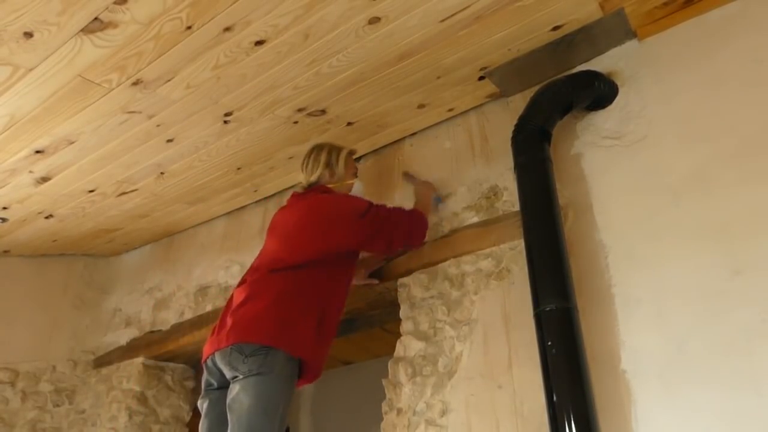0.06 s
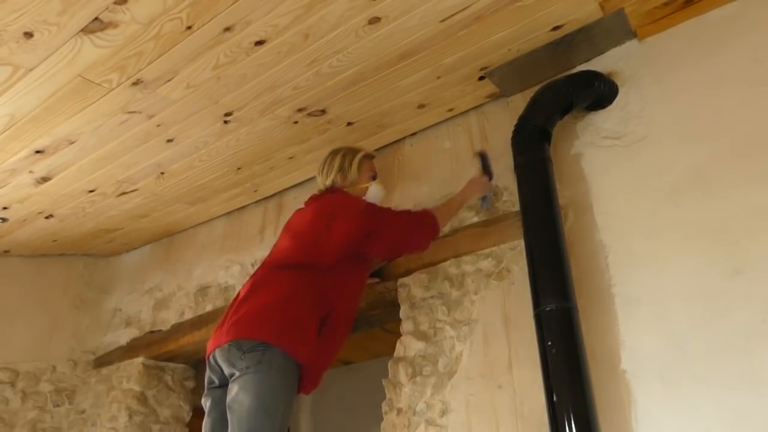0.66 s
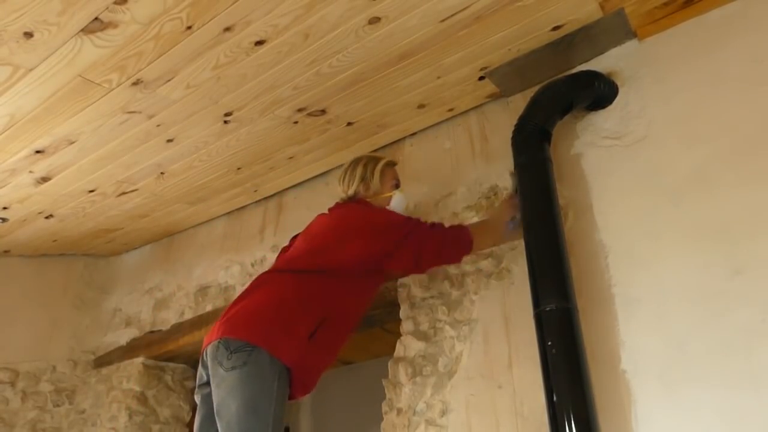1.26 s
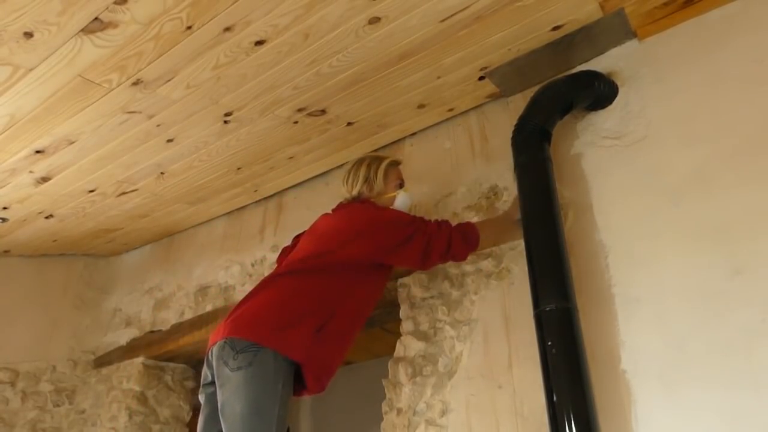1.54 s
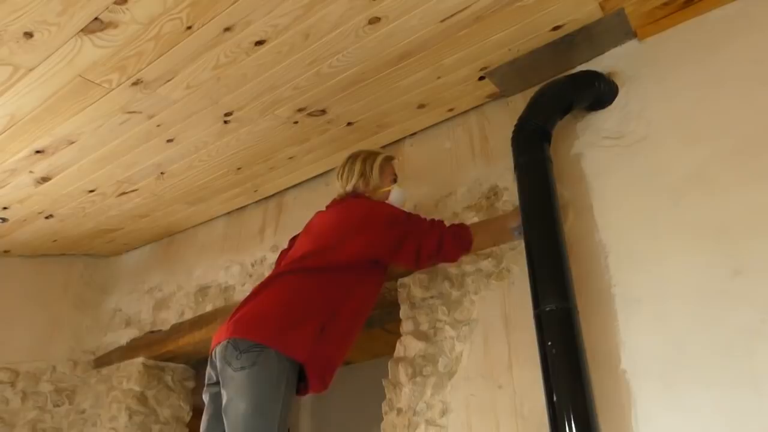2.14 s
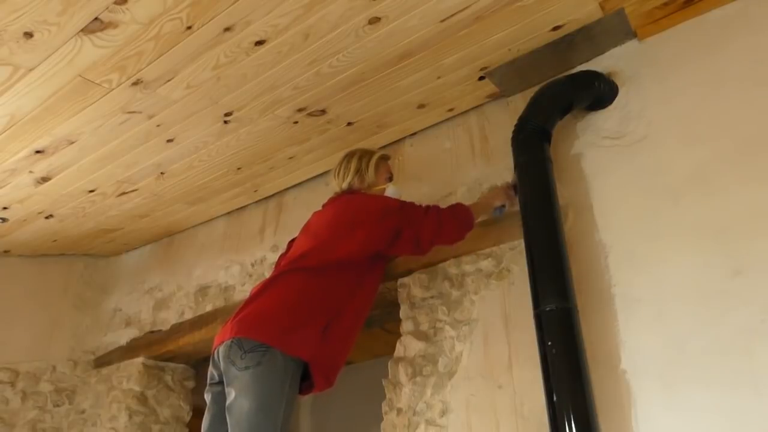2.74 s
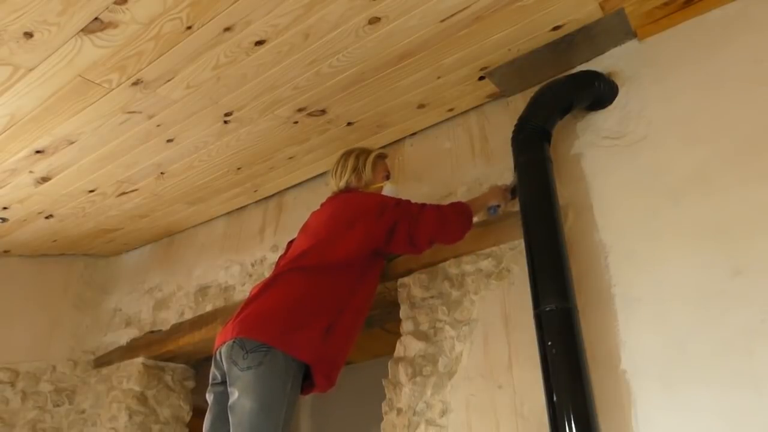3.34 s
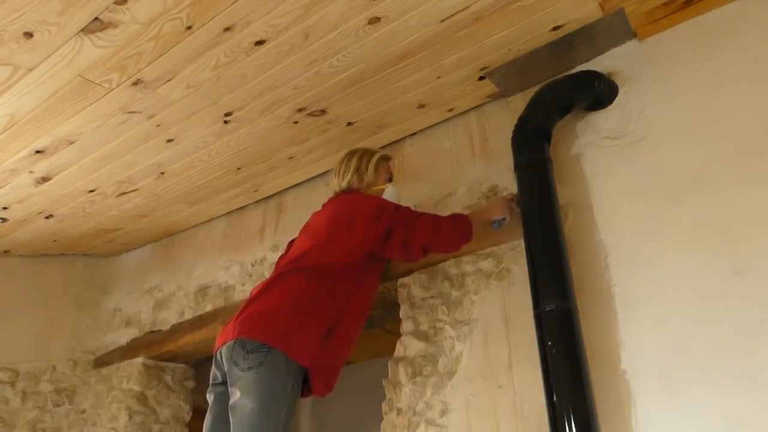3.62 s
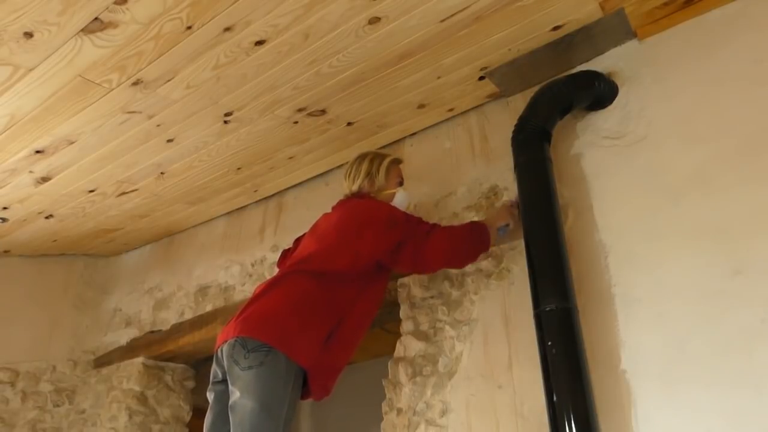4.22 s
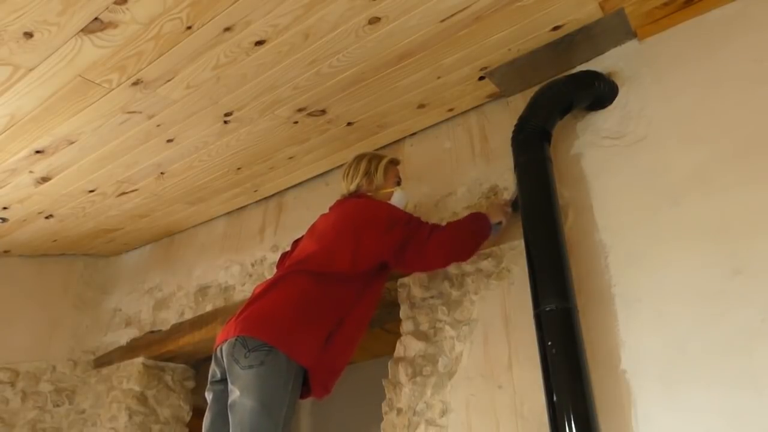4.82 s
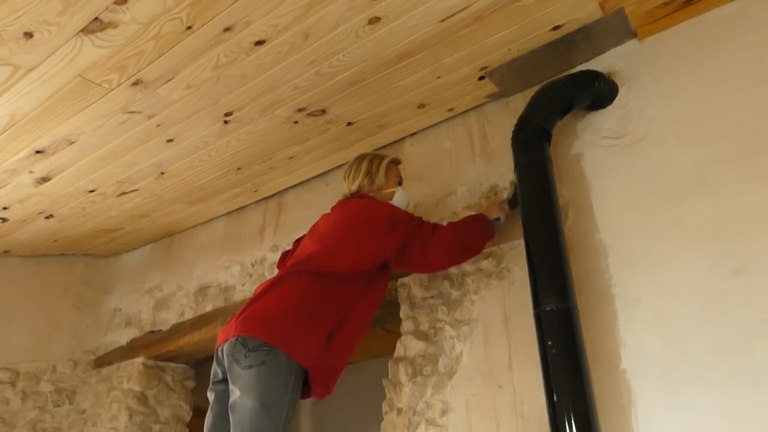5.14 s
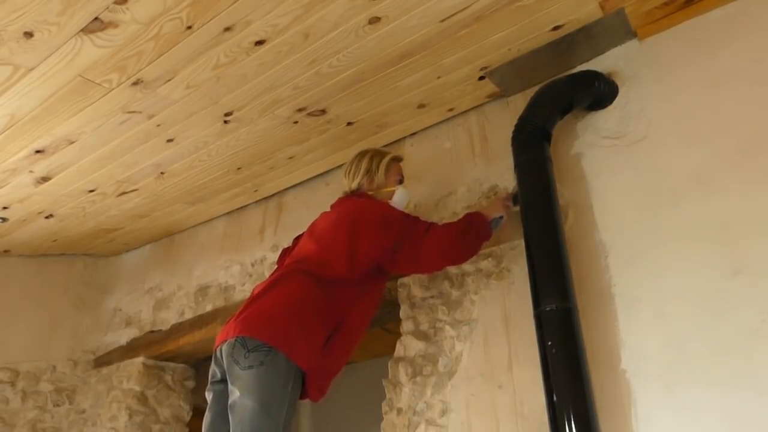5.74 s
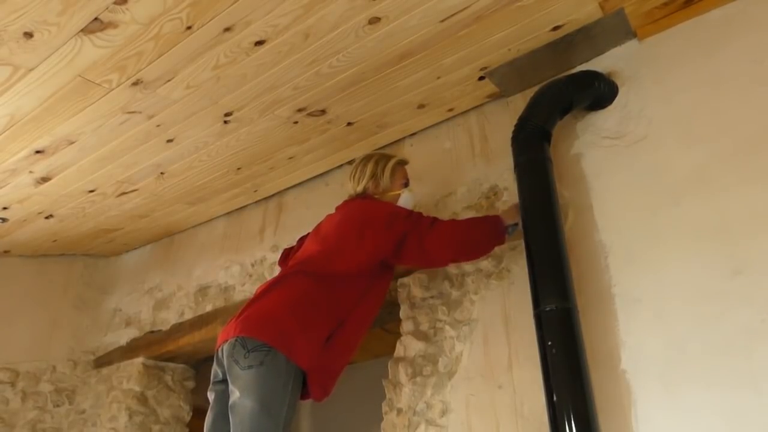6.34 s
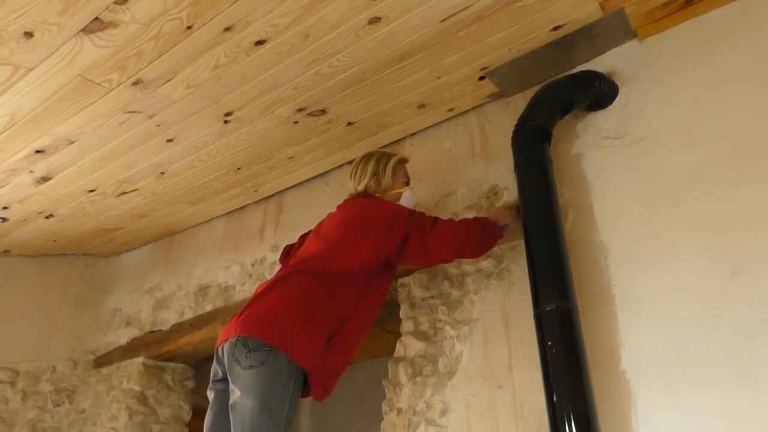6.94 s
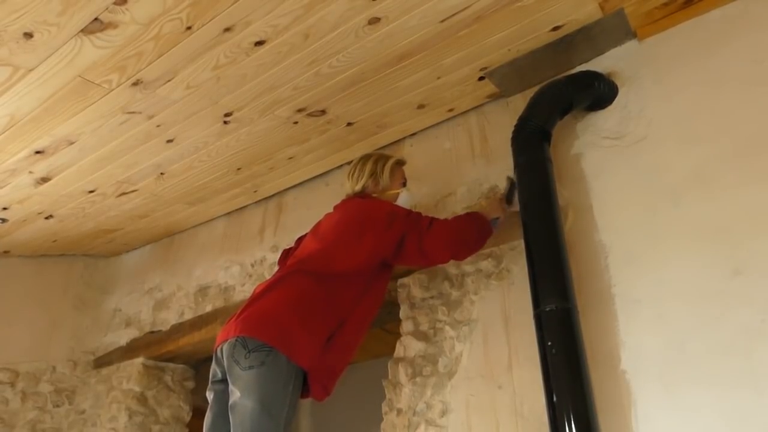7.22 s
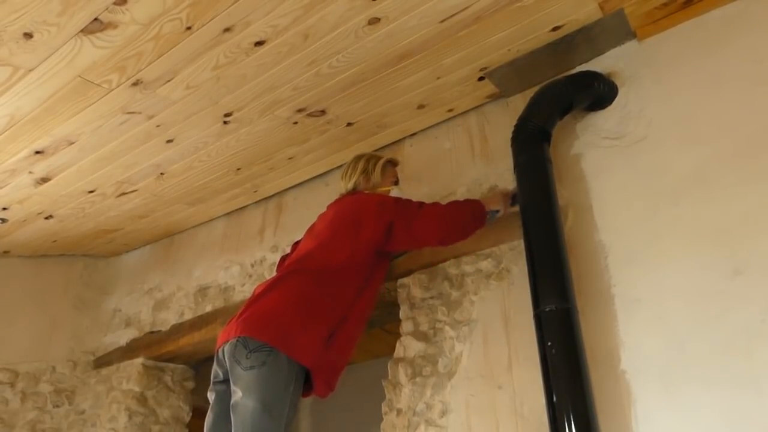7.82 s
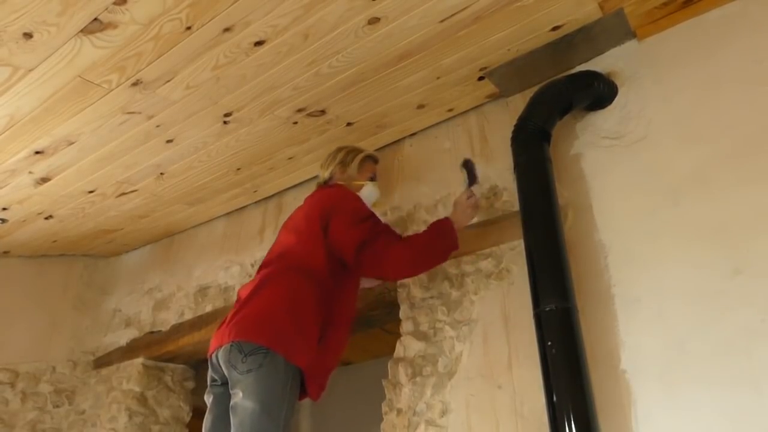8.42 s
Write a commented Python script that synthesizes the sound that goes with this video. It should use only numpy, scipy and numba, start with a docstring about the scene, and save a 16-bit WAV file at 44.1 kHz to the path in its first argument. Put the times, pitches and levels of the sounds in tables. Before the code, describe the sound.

A hand wire brush scrubs a rough stone wall a few metres away in a bare, slightly echoing room. It opens with a bristly clash and brief scratchy sweeps in the first half second, then pauses while clothes rustle faintly. Two longer hissing sweeps fall in pitch at about 1.7 and 2.2 seconds. From 2.5 seconds short, gritty back-and-forth strokes follow, catching with a lower, hollow rasp at about 3.3 and 4 seconds and running fastest from 4 to 5.6 seconds. The strokes then become more spaced, continuing until about 8.2 seconds. The wooden brush knocks lightly on landing, most clearly near 3.9, 5.9 and 7.5 seconds. The wires twang softly at 7.3 seconds, and a dull floor bump comes at 8.6. Faint room noise runs throughout, and a low draught rumbles on the microphone in puffs from about 5 seconds.

```python
"""A bare room: a hand wire brush scrubs a rough stone wall above a wooden beam, a few metres off.
The brush lands with a knock; hundreds of steel wires catch, flick over the grit and shake its wooden back.
Long sweeps bend the tuft, then quick to-and-fro strokes follow. Late on, freed wires twang and the floor
takes a dull bump. Behind it: clothes rustle, faint room noise, draught rumbling on the microphone."""
import sys
import numpy as np
from scipy import signal
from scipy.fft import rfft, irfft, next_fast_len
from scipy.io import wavfile
from numba import njit

SR = 44100
rng = np.random.default_rng(int(sys.argv[2]) if len(sys.argv) > 2 else 0)


def master_out(mix):
    """Clip the mix to full scale and print it as 16-bit PCM to the path in sys.argv[1]."""
    frames = np.transpose(np.atleast_2d(mix))
    ceiling = np.clip(frames, -1, 1)
    pcm = np.round(ceiling * 32767).astype(np.int16)
    wavfile.write(sys.argv[1], SR, pcm)


N = 381906
TIME_S = np.arange(N) / SR

# opening sweeps: middle t/s, length/s, level/dB, tuft start f/Hz, tuft end f/Hz
SWEEPS = [(0.243, 0.034, -34, 3850, 3750), (0.366, 0.12, -29.5, 3600, 3200),
          (0.476, 0.13, -23.5, 3570, 4460), (1.715, 0.28, -24.5, 2800, 1780), (2.218, 0.2, -23, 2680, 1760)]
# short strokes: middle t/s, length/s, level/dB
STROKES = [(2.62, 0.15, -26.5), (2.904, 0.13, -28.5), (3.161, 0.12, -30), (3.293, 0.06, -35),
           (3.395, 0.12, -29.5), (3.617, 0.089, -27), (3.99, 0.12, -24.5), (4.134, 0.11, -28.5),
           (4.262, 0.11, -27.5), (4.411, 0.089, -31.5), (4.518, 0.085, -26), (4.627, 0.13, -31),
           (4.765, 0.094, -30), (4.877, 0.11, -28.5), (4.998, 0.1, -32.5), (5.113, 0.12, -30),
           (5.287, 0.16, -32), (5.426, 0.12, -31), (5.595, 0.14, -27.5), (6.041, 0.099, -27),
           (6.378, 0.11, -26.5), (6.692, 0.15, -27), (6.891, 0.14, -31), (6.987, 0.068, -36),
           (7.071, 0.06, -25), (7.149, 0.11, -30), (7.245, 0.19, -40), (7.555, 0.11, -27),
           (7.847, 0.095, -27.5), (8.102, 0.11, -28)]
# catches on hollow patches of wall: t/s, level/dB, decay/s, lowest resonance f/Hz
CATCHES = [(3.312, -25.5, 0.058, 635), (3.977, -27, 0.06, 836), (4.438, -37, 0.073, 670)]
# brush meets wall: t/s, wire clash level/dB, wood knock level/dB
LANDINGS = [(0.005, -31.5, -70), (0.219, -62, -66), (1.488, -57, -67), (2.064, -65, -56),
            (2.527, -34, -42.5), (2.82, -37, -43), (3.072, -39, -51), (3.275, -44, -60), (3.531, -40, -54),
            (3.896, -34, -33.5), (4.385, -40, -64), (5.943, -41, -31), (6.283, -48, -37.5),
            (6.604, -56, -49), (7.045, -48, -52), (7.475, -27.5, -29), (7.747, -54, -40.5),
            (8.01, -44, -35), (8.252, -33.5, -58), (8.356, -40.5, -59)]
# swells: middle t/s, length/s, level/dB
SLEEVE_RUSTLES = [(0.74, 0.72, -50), (8.38, 0.32, -51.5)]
DRAUGHT_PUFFS = [(4.91, 0.31, -41), (5.38, 0.13, -34), (5.68, 0.39, -36.5), (6.38, 0.51, -40),
                 (7.0, 0.75, -45), (7.7, 0.21, -46), (8.22, 0.3, -40.5)]

# driven resonances: f/Hz, width/Hz, gain/dB
TUFT_PEAKS = [(2955, 340, 2), (4320, 270, 2.5), (5900, 470, 1.5)]
TUFT_LOW_PEAKS = [(2140, 123, 4.5), (2480, 200, -4.5)]
HOLLOW_WALL_PEAKS = [(1040, 23, 4), (1420, 300, -10), (2120, 170, -1), (3050, 720, -11)]
WOOD_PEAKS = [(171, 75, -11), (246, 20, -7), (273, 8.9, 7.5), (360, 270, -11.5)]
# struck modes: f/Hz, level/dB, t60/s
WOOD_MODES = [(137.8, -17, 0.27), (243, 1.5, 0.22), (282.9, -2.5, 0.3), (335, -16, 0.079), (438, -20, 0.24),
              (488, -11.5, 0.18), (695, -13, 0.17)]
WIRE_MODES = [(1770, -5, 0.59), (1820, -19, 0.57), (1825, -4, 0.46), (2140, -9, 0.66), (3394, -8, 0.52),
              (4340, -7, 0.5), (5480, -8, 0.76), (5700, -5, .5), (6300, -6, 0.46), (6691, -10, .35),
              (8430, 3.5, 0.31), (9450, -9, .6), (10450, -11, .6), (11900, -14, .6)]
FLOOR_MODES = [(43.5, -2, 0.6), (82, -4, 0.43), (143, 0, 0.2), (210, 0, 0.1), (1240, 6, 0.012),
               (1600, 4, 0.01)]
# spectral shapes: f/Hz, gain/dB
SCRAPE_EQ = [(880, -35.5), (1500, -11), (2160, -4.5), (2340, -7), (3570, -0.5), (4390, 4.5), (5090, -1.5),
             (6200, -0.5), (8090, -1.5), (10100, -5), (13000, -13.5), (14900, -23), (15800, -26)]
BITE_EQ = [(150, -43), (350, -6.5), (520, -8), (800, -4.5), (1300, -4.5), (2000, -1), (2500, -7),
           (3500, -19.5)]
CLASH_EQ = [(200, -6), (700, -0.5), (2000, 7.5), (4200, 7), (8000, 5.5), (12000, -1), (16000, -15)]
THUD_EQ = [(50, -16), (90, -1.5), (160, 6.5), (300, -0.5), (450, -6.5), (750, -8.5), (1200, -31),
           (3000, -53)]
CLOTH_EQ = [(100, -14.5), (400, -7), (900, 2.5), (2100, 1.5), (2600, -14.5), (4500, -11), (5500, -12),
            (10000, -19), (16000, -33)]
ROOM_NOISE_EQ = [(47, -51), (80, -9), (109, 5), (699, 3.5), (816, 4.5), (1580, -12.5), (2070, 2.5),
                 (2410, -4.5), (4380, -2), (5110, -7.5), (7960, -7.5), (14800, -13.5), (15800, -22)]
DRAUGHT_EQ = [(10, -20), (25, -5), (40, -2.5), (58, -12), (90, -23), (200, -44), (600, -80)]
# faint left-right spread, wider in the treble: f/Hz, gain/dB
STEREO_WIDTH_EQ = [(100, -30), (500, -25.5), (2000, -26.5), (5000, -24), (10000, -20), (15000, -17)]

USUAL_STROKE_DB = -27.5
SWEEP_SQUARENESS, STROKE_SQUARENESS = 4.2, 3.1  # 2: bell; more: flatter top
SIDE_SIGNS = np.array([[1], [-1]])  # left, right


def scrubbing():
    """Wire tips stick and slip on stone; hand pressure drives hiss and tuft resonances."""
    ridges = level(undb(0.69 * walk(70) + 0.53 * walk(600)))  # stone ridges: wires slip in bunches
    slips = flicks(rate_hz=6500, spread_db=1.5)
    tips = colour(slips + undb(-7) * wire_rings(wires=220, plucks=69, t60_s=0.045), SCRAPE_EQ)
    hiss = signal.sosfilt(signal.butter(3, 7000, "low", fs=SR, output="sos"), tips)
    sizzle = signal.sosfilt(signal.butter(3, 7000, "high", fs=SR, output="sos"), tips)
    tuft = resonate(flicks(rate_hz=4000, spread_db=2), TUFT_PEAKS)
    scrape = level(hiss, -5) + level(tuft, -10) + level(sizzle, -4.5)
    # deeper wires rasp lower; sweeps dig in less
    bite = level(colour(flicks(rate_hz=3000, spread_db=4.5), BITE_EQ), -2)
    bite += level(resonate(flicks(rate_hz=3000, spread_db=6), TUFT_LOW_PEAKS), -6.5)
    bite *= effort(usual_db=-36, db_per_db=0.85, sweep_db=-4.5)
    return ridges * (effort() * scrape + bite + bent_tuft())


def wire_rings(wires, plucks, t60_s):
    """Single wires, plucked at random, each ringing at its own pitch in 1.8-14.4 kHz."""
    t = TIME_S[:SR // 10]
    out = np.zeros(N)
    for pitch, *moments in rng.random((wires, 1 + plucks)):
        ping = np.sin(2 * np.pi * 1800 * 8 ** pitch * t) * decay(t, t60_s)
        for first in (np.array(moments) * (N - len(t))).astype(int):
            out[first:first + len(t)] += ping * rng.standard_normal()
    return level(out)


def bent_tuft(width_hz=910, dip_depth=0.98, dip_share=0.23):
    """Tuft resonance glides over each sweep; its level dips mid-sweep, at full hand speed."""
    slips = flicks(rate_hz=3600, spread_db=1)
    out = np.zeros(N)
    for middle_s, length_s, db, start_hz, end_hz in SWEEPS:
        hz = np.interp(TIME_S, [middle_s - length_s / 2, middle_s + length_s / 2], [start_hz, end_hz])
        song = level(bandpass(bandpass(slips, hz, width_hz), hz, width_hz), -8)
        dip = 1 - dip_depth * swells([(middle_s, dip_share * length_s, 0)])
        out += song * swells([(middle_s, length_s, db)], SWEEP_SQUARENESS) * dip
    return out


def catches(attack_s=0.0076):
    """Wires dig into a hollow patch: a lower, resonant rasp."""
    out = np.zeros(N)
    for start_s, db, decay_s, lowest_hz in CATCHES:
        rasp = resonate(flicks(rate_hz=2800, spread_db=6), [(lowest_hz, 90, 1)] + HOLLOW_WALL_PEAKS)
        out += (fade(start_s, decay_s) - fade(start_s, attack_s)) * level(rasp, db)
    return out


def clashes(reach_s=0.15):
    """Landing wires hit stone in a short spray, then drag lightly if a stroke or sweep follows."""
    middle_s, length_s = np.transpose([row[:2] for row in SWEEPS + STROKES])
    envelope = np.zeros(N)
    for start_s, clash_db, _ in LANDINGS:
        envelope += undb(clash_db) * fade(start_s, decay_s=0.007)
        if np.any((middle_s > start_s) & (middle_s - length_s / 2 < start_s + reach_s)):
            envelope += undb(-39) * fade(start_s, decay_s=0.062)
    return envelope * level(colour(flicks(rate_hz=6400, spread_db=2), CLASH_EQ), -0.47)


def wooden_back():
    """Brush back knocks and thuds on landing, drones while the wires shake it."""
    knocks, thud_envelope = np.zeros((2, N))
    for start_s, _, knock_db in LANDINGS:
        knocks += undb(knock_db) * ring(WOOD_MODES, start_s, detune=0.0058 * rng.standard_normal())
        thud_envelope += undb(knock_db) * fade(start_s, decay_s=0.097)
    thuds = thud_envelope * noise(THUD_EQ, -5)
    drone = level(resonate(flicks(rate_hz=1500, spread_db=1), WOOD_PEAKS))
    return knocks + thuds + drone * effort(usual_db=-43.5, db_per_db=0.56, sweep_db=-10.5)


def twang():
    """Wires spring free and ring on."""
    return undb(-42) * ring(WIRE_MODES, start_s=7.27)


def floor_bump():
    """One dull bump: low floor modes under a brief tick."""
    return undb(-30.5) * ring(FLOOR_MODES, start_s=8.559)


def clothes():
    """Cloth crinkles faintly throughout, more as the arm draws back."""
    crinkle = level(colour(flicks(rate_hz=5000, spread_db=7.5), CLOTH_EQ))
    return crinkle * np.hypot(undb(-64), swells(SLEEVE_RUSTLES)) * undb(1.9 * walk(30))


def room(x, low_t60_s=0.43, treble_t60_s=0.28):
    """Diffuse tail, shorter in the treble, plus a faint left-right spread."""
    t = TIME_S[:int(0.7 * SR)]
    tails = []
    for white in rng.standard_normal((2, len(t))):
        low = signal.lfilter(*signal.butter(1, 4000, fs=SR), white)
        tail = (low * decay(t, low_t60_s) + (white - low) * decay(t, treble_t60_s)) * (t > 0.003)
        tails.append(signal.fftconvolve(x, tail / np.linalg.norm(tail))[:N])
    # the tail shifts as the brush moves along the wall
    field = (tails[0] + 1j * tails[1]) * np.exp(1.3j * walk(6))
    spread = colour(field.imag, STEREO_WIDTH_EQ) * SIDE_SIGNS
    return undb(-4) * field.real + spread


def draught():
    """Air flutters on the microphone: low rumble with puffs."""
    rumble = noise(DRAUGHT_EQ) + noise(DRAUGHT_EQ, -28) * SIDE_SIGNS
    return rumble * np.hypot(undb(-50.5), swells(DRAUGHT_PUFFS)) * undb(1.8 * walk(5.6))


def room_noise():
    """Faint steady background."""
    return noise(ROOM_NOISE_EQ, -51.5) + noise(ROOM_NOISE_EQ, -70) * SIDE_SIGNS


def effort(usual_db=USUAL_STROKE_DB, db_per_db=1, sweep_db=0):
    """Hand-driven envelope: usual_db at a usual stroke, rising db_per_db with stroke level."""
    def scaled(rows):
        return [(middle_s, length_s, usual_db + db_per_db * (db - USUAL_STROKE_DB))
                for middle_s, length_s, db, *_ in rows]
    sweeps = undb(sweep_db) * swells(scaled(SWEEPS), SWEEP_SQUARENESS)
    return sweeps + swells(scaled(STROKES), STROKE_SQUARENESS)


def swells(rows, squareness=2):
    """Rounded swells; overlaps add in power."""
    t = TIME_S[::20]
    middle_s, length_s, db = np.transpose(rows)[:, :, None]
    each = undb(db) * np.exp(-np.abs(2 * (t - middle_s) / length_s) ** squareness)
    return np.interp(TIME_S, t, np.sqrt(np.sum(each ** 2, axis=0)))


def flicks(rate_hz, spread_db):
    """Random clicks of uneven size, unit rms."""
    hit = rng.random(N) < rate_hz / SR
    return level(hit * rng.choice([-1, 1], N) * undb(spread_db * np.clip(rng.standard_normal(N), -2, 2)))


def ring(modes, start_s, detune=0):
    """Decaying modes, struck once."""
    first = int(start_s * SR)
    t = TIME_S[:min(SR, N - first)]
    out = np.zeros(N)
    for hz, db, t60_s in modes:
        out[first:first + len(t)] += undb(db) * decay(t, t60_s) * np.sin(2 * np.pi * hz * (1 + detune) * t)
    return out


def resonate(x, peaks):
    """Parallel resonances."""
    return sum(undb(db) * signal.lfilter(*signal.iirpeak(hz, hz / width_hz, fs=SR), x)
               for hz, width_hz, db in peaks)


@njit
def bandpass(x, hz, width_hz):
    """State-variable band-pass, moving centre."""
    out, band_state, low_state = np.empty(len(x)), 0., 0.
    for i in range(len(x)):
        gain, damping = np.tan(np.pi * hz[i] / SR), width_hz / hz[i]
        band = (band_state + gain * (x[i] - low_state)) / (1 + gain * (gain + damping))
        band_state = 2 * band - band_state
        low_state += 2 * gain * band
        out[i] = damping * band
    return out


def colour(x, eq):
    """Minimum-phase filter from a spectral shape."""
    hz, db = np.transpose(eq)
    size = 2 * next_fast_len(N // 2 + SR // 4)
    bins_hz = np.maximum(np.arange(size // 2 + 1) * SR / size, 1)
    cepstrum = irfft(np.log(undb(np.interp(np.log(bins_hz), np.log(hz), db))))
    cepstrum[1:size // 2] *= 2
    cepstrum[size // 2 + 1:] = 0
    return irfft(rfft(x, size) * np.exp(rfft(cepstrum)))[:N]


def noise(eq, rms_db=0):
    """Shaped Gaussian noise."""
    return level(colour(rng.standard_normal(N), eq), rms_db)


def walk(rate_hz):
    """Random wander, spread near 1."""
    return 1.2 * np.interp(TIME_S * rate_hz, np.arange(16384), rng.standard_normal(16384))


def fade(start_s, decay_s):
    """Step, then 1/e fall per decay_s."""
    return (TIME_S >= start_s) * np.exp(-np.clip((TIME_S - start_s) / decay_s, 0, 20))


def decay(t, t60_s):
    """60 dB fall per t60_s."""
    return np.exp(-np.log(1000) * t / t60_s)


def level(x, rms_db=0):
    """Scale to an rms level."""
    return x * undb(rms_db) / np.sqrt(np.mean(x ** 2))


def undb(db):
    """dB to gain."""
    return 10 ** (np.asarray(db) / 20)


def scene():
    """Brush, clothes and bump in the room, over room noise and draught."""
    rubbing = scrubbing() + clashes() + catches() + clothes()
    ringing = wooden_back() + twang() + floor_bump()
    wet = room(rubbing + undb(-3) * ringing)
    return undb(0.4) * rubbing + ringing + wet + room_noise() + draught()


def record(dry):
    """Steep low-pass at 15.75 kHz."""
    return signal.sosfilt(signal.ellip(10, 0.2, 75, 15750, fs=SR, output="sos"), dry)


dry = scene()
out = record(dry)
master_out(out)
```